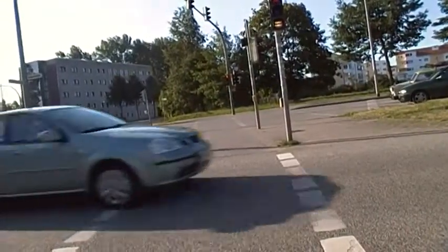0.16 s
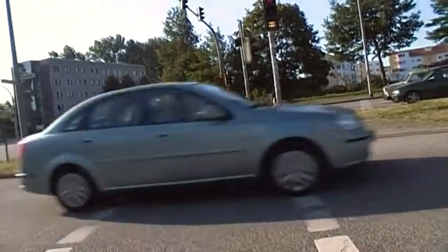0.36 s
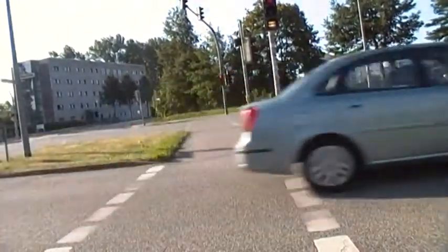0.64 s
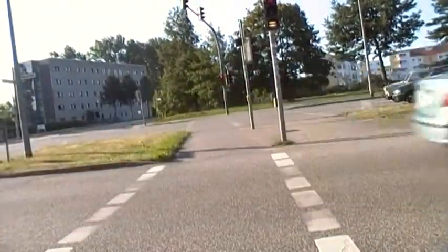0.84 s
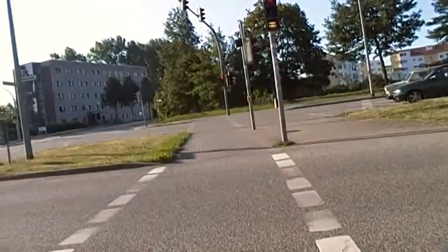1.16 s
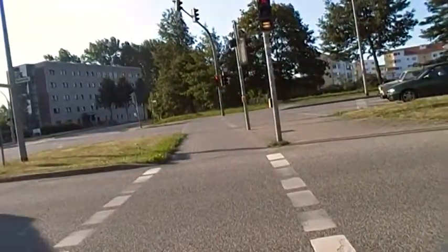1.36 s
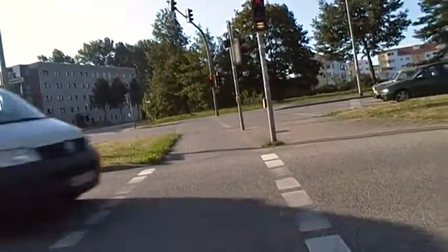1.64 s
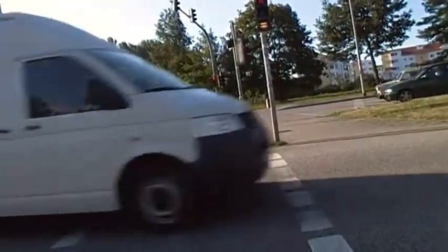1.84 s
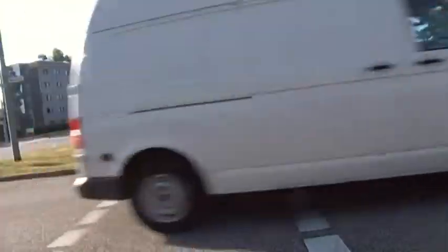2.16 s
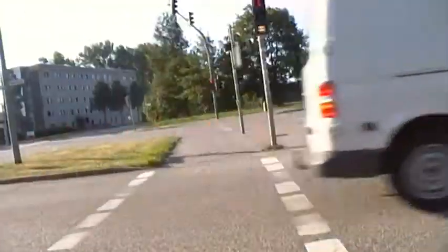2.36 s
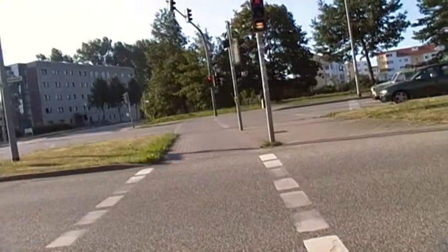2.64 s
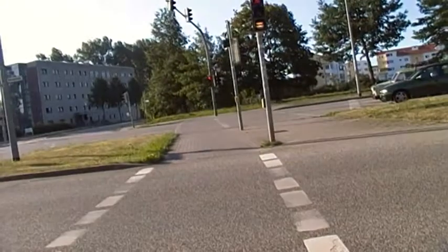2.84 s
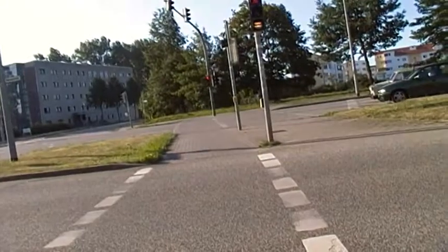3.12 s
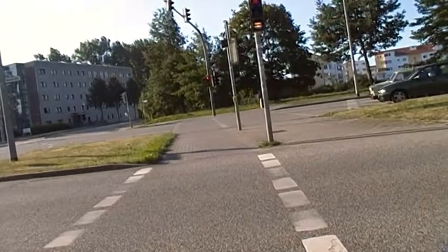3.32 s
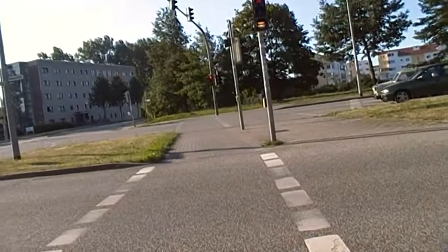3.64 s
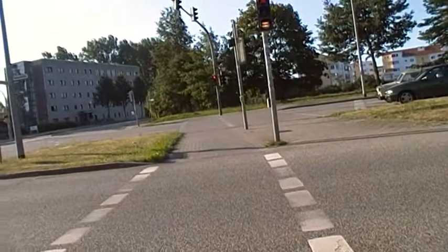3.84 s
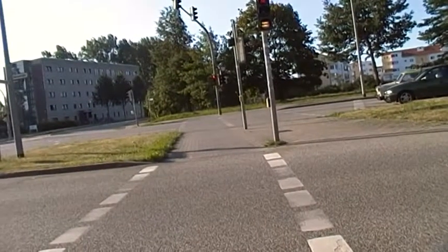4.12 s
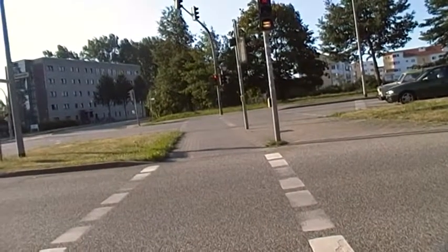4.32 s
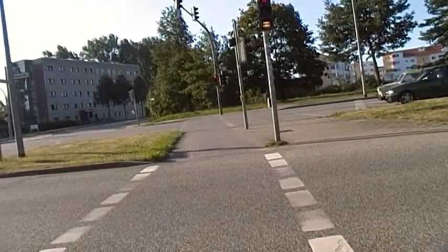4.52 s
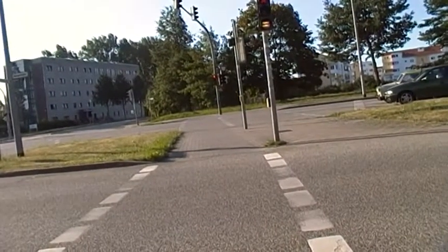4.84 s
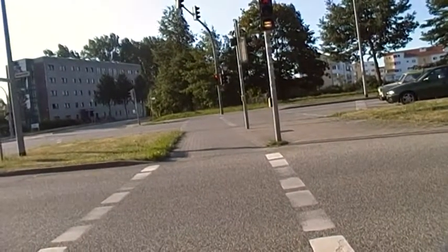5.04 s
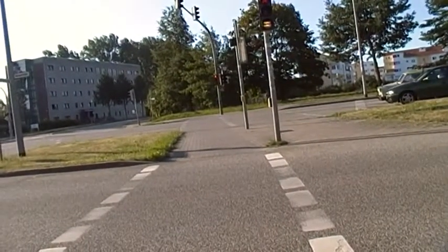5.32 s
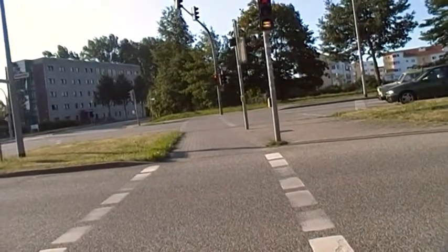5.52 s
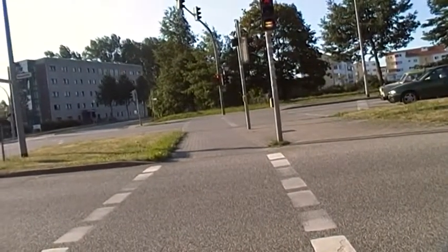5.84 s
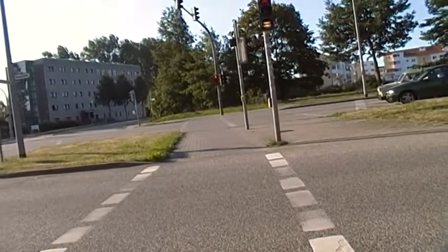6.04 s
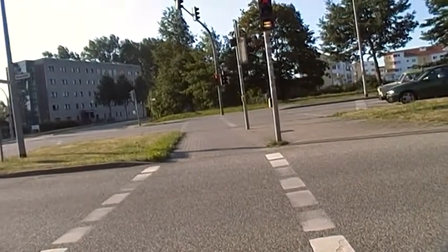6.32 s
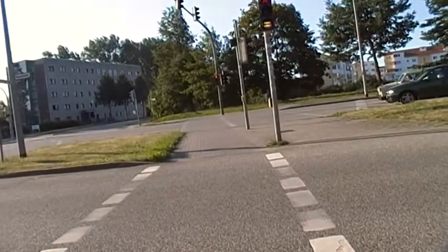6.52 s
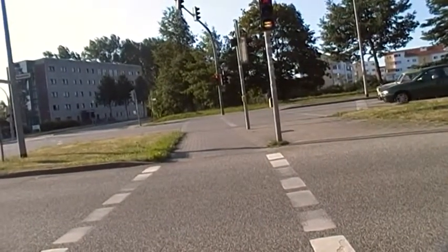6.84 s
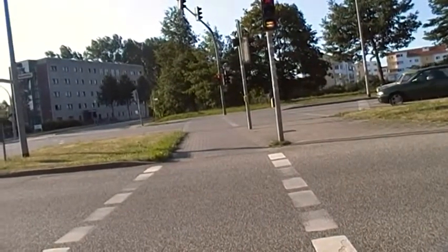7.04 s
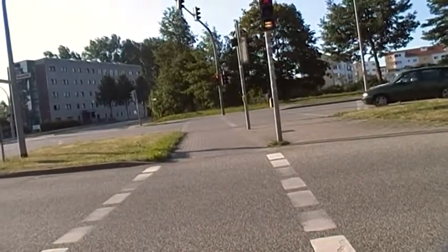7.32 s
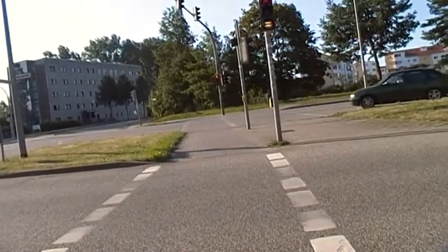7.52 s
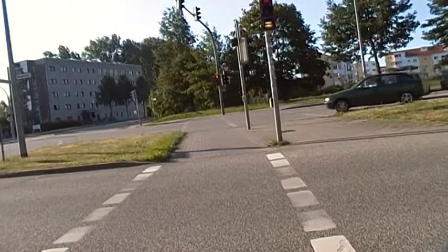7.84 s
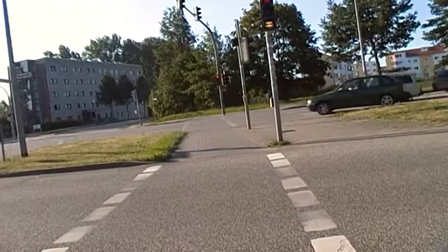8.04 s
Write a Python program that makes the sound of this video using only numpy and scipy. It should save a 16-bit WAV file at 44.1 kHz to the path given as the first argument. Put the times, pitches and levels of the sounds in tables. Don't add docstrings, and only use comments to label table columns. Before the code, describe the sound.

Strong wind buffets the microphone over passing cars and a van with rushing tyres, then a nearby engine revs and settles as traffic hums.

```python
import sys
import numpy as np
from scipy import signal
from scipy.fft import rfft, irfft
from scipy.io import wavfile
from scipy.ndimage import map_coordinates

SR = 44100
rng = np.random.default_rng(int(sys.argv[2]) if len(sys.argv) > 2 else 0)


def int16_out(signal):
    q = np.round(np.clip(np.atleast_2d(signal).T, -1, 1) * 32767)
    wavfile.write(sys.argv[1], SR, q.astype(np.int16))


def volts_from_decibels(level):
    exponent = np.asarray(level, float) / 20
    return 10 ** exponent


N = 360738
TIME = np.arange(N) / SR
COARSE = TIME[::32]

# f/Hz, level/dB [per Hz]
TOWN_HISS = [(1500, -20), (2500, -12), (5000, -10.5), (8000, -15), (9500, -21.5), (10600, -31)]
# f/Hz, level/dB [per Hz]
BODY_DRONE = [(25, -7.5), (60, 6), (120, -1), (250, -2.5), (450, -3.5), (650, -2), (850, -7.5), (1200, -35)]
# f/Hz, level/dB [per Hz]
TYRE_ROAR = [(500, -37.5), (720, -2.5), (900, 1.5), (1100, 1), (1400, 0), (1700, -3), (2000, -9),
             (2600, -16.5)]
# f/Hz, level/dB [per Hz]
TREAD_HISS = [(1300, -31.5), (1900, -2.5), (2600, -3), (3400, -0.5), (4300, -3.5), (5600, -8.5),
              (6400, -8.5), (7800, -14.5), (8800, -21), (9800, -35)]
# f/Hz, likeness [0..1]
LIKENESS = [(60, 0.86), (300, 1), (600, 0.95), (1200, 0.93), (2500, 0.93), (5000, 0.84), (10000, 0.19)]
# drone level/dB, roar level/dB, hiss level/dB
STREAM_DB = [-28.5, -29, -34]
# nearest t/s, distance over speed/s, drone level/dB, roar level/dB, hiss level/dB
PASSES = [(.72, 0.31, -18, -19, -41), (1.35, 0.32, -21.5, -17.5, -24.5), (2.15, 0.23, -22.5, -27.5, -21.5),
          (3.0, 0.15, -23.5, -26.5, -25.5), (3.5, 0.29, -24.5, -22.5, -31), (4.2, 0.32, -36.5, -20, -29),
          (5.2, 0.66, -29.5, -20, -33.5), (6.8, 0.41, -27, -23, -32), (7.5, 0.59, -48, -22.5, -44),
          (2.7, 0.13, -41, -24, -30), (1.7, 0.084, -21.5, -29, -25.5)]
# t/s, length/s, f/Hz, width/Hz, level/dB
VAN_BANDS = [
    (1.6, .35, 940, 90, -27),
    (2.12, .5, 880, 120, -26),
    (2.15, .4, 540, 110, -32),
    (2.2, .7, 3400, 420, -31),
    (1.9, .5, 4300, 400, -35),
    (2.8, .4, 650, 200, -30),
    (1.15, .25, 3500, 500, -36),
    (2.75, .3, 300, 120, -30),
    (3.33, .12, 520, 200, -27),
    (2.67, .16, 4150, 500, -36),
]
# t/s, left over right level/dB, left later by/ms
BEARING = [
    (0, 0.5, -0.079),
    (1.0, -4, -0.034),
    (1.5, 0, -0.046),
    (2.4, 1, 0.019),
    (3.2, 3, 0.046),
    (4.0, -1.5, 0.051),
    (4.6, -1, 0.042),
    (8.18, -0.8, 0.038),
]
# t/s, length/s, f/Hz, width/Hz, level/dB
SQUEALS = [
    (6.47, .1, 9750, 400, -54),
    (6.79, .18, 9900, 450, -49),
    (7.05, .17, 9880, 450, -50),
]
# t/s, firing f/Hz, firing tone level/dB
ENGINE = [
    (5.4, 57, -32),
    (6.3, 54.5, -33),
    (6.45, 52.5, -26),
    (6.56, 63, -19),
    (6.68, 75, -16),
    (6.82, 76.5, -16),
    (7.28, 66.2, -17),
    (7.7, 57.5, -20.5),
    (8.18, 57.2, -22),
]
# multiple of the firing rate, level/dB [over the firing tone]
UPPER_ORDERS = [(.5, -22), (1.5, -21), (2.5, -24), (4, -25), (5, -30)]
# f/Hz, level/dB
EXHAUST = [(105, -4), (115, -4), (122, -12), (153, -12), (165, -7), (182, -10), (198, -13), (212, -23)]
# t/s, f/Hz, level/dB
PULLING_AWAY = [
    (7.7, 112, -44),
    (7.88, 116, -30),
    (8.02, 130, -27),
    (8.18, 146, -27),
]
# t/s, left level/dB, right level/dB
WIND = [(0, -19, -20), (.5, -16, -27), (.75, -20.5, -15), (1.0, -14.5, -27.5), (1.45, -18.5, -21),
        (2.2, -26, -31), (2.93, -15, -34), (3.17, -22.5, -23), (3.45, -19.5, -28), (3.85, -14.5, -24),
        (4.3, -17, -15.5), (4.55, -17, -23.5), (4.78, -17, -14), (4.94, -16.5, -20.5), (5.32, -14, -25),
        (5.55, -23, -25), (6.9, -39, -58), (7.85, -32.5, -25)]
# f/Hz, level/dB [per Hz]
BUFFET = [(12, -38), (20, -14), (55, 5), (211, -2), (256, -14), (305, -4), (406, -25.5), (698, -27),
          (900, -61), (1170, -46), (1980, -120)]
# f/Hz, level/dB [per Hz]
EDGE_FLUTTER = [(140, 4), (230, 2), (380, 0.5), (520, -9)]
# f/Hz, level/dB [per Hz]
RASP = [(7000, -12), (9000, -6), (11000, 1), (12000, -1)]
# t/s, peak level/dB [as heard], drop of the gain control/dB
BLOWS_LEFT = [(.012, -9, 2.5), (.094, -3.5, -1), (.151, 0, 7), (.222, -8, 7), (.252, 1, 3.5),
              (.364, -3, 9.5), (.452, -9, 5.5), (.573, -2, 3.5), (.611, 6.5, 14.5), (.65, -1, 6),
              (.712, 1.5, 10.5), (.804, 1, 6), (.857, -4, 10), (.903, -5, 7), (.973, -1, 9.5), (1.1, -2, 4),
              (1.243, -7, 2.5), (1.311, -10, 10.5), (1.688, -3, 4), (2.312, -3, 0), (3.728, -6, 4),
              (4.04, -8, 2.5), (4.161, -7, 3.5), (4.63, -5, 1.5), (4.728, -6, 3.5), (5.041, -4, 11.5),
              (5.138, 3, 10), (5.184, -12, 11), (5.26, -10.5, 9), (5.352, -5, 10)]
BLOWS_RIGHT = [(.01, -14, 4), (.098, 9, -2), (.126, 8, -6), (.202, 7, 9.5), (.227, -3, 5), (.385, 10, 17),
               (.46, -9, 16), (.553, -2, 16), (.617, -5, 10), (.752, -1, 14), (.85, -12, 10),
               (.98, 0, 10.5), (1.106, -4, 4), (1.234, -1.5, 12.5), (1.34, 1, 8), (1.759, -5, -7),
               (1.958, -6, 2.5), (2.124, -5, 3), (2.31, -.5, 6.5), (3.224, -5, -4), (3.779, -5, 5.5),
               (4.21, -6, -2), (4.273, 1, 5.5), (4.357, -3, 5), (4.443, -1.5, 9), (4.474, -6, 18),
               (4.73, -6, 7.5), (4.846, -1.5, 9.5), (5.226, -6, -1)]
# left f/Hz, right f/Hz
BLOW_HZ = [172, 213]
# left/s, right/s
RECOVERY_S = [0.062, 0.083]
SLOW_SHARE = [0.16, 0.58]


def rms_one(x):
    return x / np.sqrt(np.mean(x ** 2) + 1e-20)


def in_time(rows):
    s, *columns = np.transpose(rows)
    return [np.interp(TIME, s, c) for c in columns]


def at_hz(points, hz):
    point_hz, level = np.transpose(points)
    return np.interp(np.log(hz), np.log(point_hz), level)


def drift(rate):
    r = np.exp(-80 * np.pi * rate / SR)
    white = rng.standard_normal(N // 40 + 2002)
    slow = signal.lfilter([1], [1, -2 * r, r * r], white)[2000:]
    return np.interp(np.arange(N) / 40, np.arange(len(slow)), rms_one(slow))


def drift_pair(rate):
    return np.array([drift(rate), drift(rate)])


def coloured(spectrum, channels):
    hz = np.maximum(np.fft.rfftfreq(N, 1 / SR), 1)
    closed = [(spectrum[0][0] / 2, -70)] + list(spectrum) + [(spectrum[-1][0] * 2, -70)]
    white = rfft(rng.standard_normal((channels, N)))
    return rms_one(irfft(white * volts_from_decibels(at_hz(closed, hz)), N))


def swells(rows):
    out = np.zeros(N)
    for s, length, hz, width, level_db in rows:
        r = np.exp(-np.pi * width / SR)
        pole = [1, -2 * r * np.cos(2 * np.pi * hz / SR), r * r]
        once = signal.lfilter([1], pole, rng.standard_normal(N))
        band = signal.lfilter([1], pole, once)
        bell = np.exp(-(2 * (TIME - s) / length) ** 2)
        out += volts_from_decibels(level_db) * bell * rms_one(band)
    return out


def road_noise(spectrum, patchy_db, flutter_db):
    mid, side = rfft(coloured(spectrum, channels=2))
    hz = np.maximum(np.fft.rfftfreq(N, 1 / SR), 1)
    alike = np.clip(at_hz(LIKENESS, hz), 0, 1)
    pair = np.sqrt(1 + alike) * mid + np.sqrt(1 - alike) * side * [[1], [-1]]
    low_hz, high_hz = spectrum[1][0], spectrum[-2][0]
    place = np.clip(2 * np.log(hz / low_hz) / np.log(high_hz / low_hz), 0, 2)
    together, out = drift(9.9), 0
    for zone in range(3):
        share = np.clip(1 - abs(place - zone), 0, 1)
        waver_db = patchy_db * drift(1.16) + flutter_db * together
        out = out + irfft(pair * share, N) * volts_from_decibels(waver_db)
    return rms_one(out)


def passing():
    power = volts_from_decibels(np.array(STREAM_DB)[:, None]) ** 2
    for s, reach, *level_db in PASSES:
        nearness = 1 / (1 + ((COARSE - s) / reach) ** 2)
        power = power + volts_from_decibels(np.array(level_db)[:, None]) ** 2 * nearness
    return [np.interp(TIME, COARSE, layer) for layer in 10 * np.log10(power)]


def traffic():
    drone_db, roar_db, hiss_db = passing()
    pan_db, late_ms = in_time(BEARING)
    sound = volts_from_decibels(drone_db + 0.5) * road_noise(BODY_DRONE, patchy_db=0.8, flutter_db=1.3)
    sound += volts_from_decibels(roar_db) * road_noise(TYRE_ROAR, patchy_db=0.5, flutter_db=0.6)
    sound += volts_from_decibels(hiss_db) * road_noise(TREAD_HISS, patchy_db=0.4, flutter_db=0.5)
    sound += volts_from_decibels(-39) * road_noise(TOWN_HISS, patchy_db=0.4, flutter_db=0.3)
    sound += swells(VAN_BANDS)
    late = np.arange(N) - late_ms * SR / 1000
    left = map_coordinates(sound[0], [late], order=3, mode="nearest")
    return np.array([left * volts_from_decibels(pan_db / 2), sound[1] * volts_from_decibels(-pan_db / 2)])


def brake():
    return swells(SQUEALS) * volts_from_decibels([[2.], [-3.]])


def tone(hz, wobble_db, rate):
    turns = np.cumsum(hz) / SR + rng.random()
    return np.sqrt(2) * np.sin(2 * np.pi * turns) * volts_from_decibels(wobble_db * drift(rate))


def engines():
    hz, firing_db = in_time(ENGINE)
    pulling = (TIME > 6.62) * (TIME < 7.27)
    second_db = firing_db + at_hz(EXHAUST, 2 * hz)
    third_db = firing_db + at_hz(EXHAUST, 3 * hz) - 9 * pulling
    sound = volts_from_decibels(firing_db) * tone(hz, wobble_db=1.3, rate=16)
    sound += volts_from_decibels(second_db) * tone(2 * hz, wobble_db=1.8, rate=14)
    sound += volts_from_decibels(third_db) * tone(3 * hz, wobble_db=1.8, rate=14)
    for multiple, level_db in UPPER_ORDERS:
        sound += volts_from_decibels(firing_db + level_db) * tone(multiple * hz, wobble_db=5.5, rate=34)
    sound *= np.clip((TIME - ENGINE[0][0]) / 0.12, 0, 1)
    other_hz, other_db = in_time(PULLING_AWAY)
    other = volts_from_decibels(other_db) * tone(other_hz, wobble_db=0.5, rate=13)
    return sound + other * (TIME > PULLING_AWAY[0][0])


def ducking(rows, attack, recovery, share):
    drop_db = np.zeros(len(COARSE))
    for s, _, depth_db in rows:
        age = np.maximum(COARSE - s, 0)
        quick = (1 - share) * np.exp(-(age / recovery) ** 2)
        slow = share * np.exp(-age / 0.35)
        drop_db = np.maximum(drop_db, np.minimum(age / attack, 1) * depth_db * (quick + slow))
    return volts_from_decibels(-np.interp(TIME, COARSE, drop_db))


def thumps(rows, cycles):
    out = np.zeros(N)
    for (s, peak_db, hz), turn in zip(rows, rng.random(len(rows))):
        at = np.arange(max(int((s - 0.03) * SR), 0), int((s + 0.03) * SR))
        phase = (at / SR - s) * hz
        crest = np.exp(-abs(phase / cycles))
        out[at] += volts_from_decibels(peak_db) * crest * np.cos(2 * np.pi * (phase + turn))
    return out


def blows(rows, side, wind_db, cycles):
    when, force, pace = rng.random((70, 3)).T
    s = 0.04 + when * (TIME[-1] - 0.1)
    small_db = np.interp(s, TIME, wind_db) + 5.5 + 9.7 * (force - 0.5)
    small = list(zip(s, small_db, 95 + 70 * pace))
    strong = [(s, db, BLOW_HZ[side] + 6 * db) for s, db, _ in rows]
    return thumps(strong + small, cycles)


def swelling(rows):
    near = sum(np.exp(-((COARSE - s) / 0.065) ** 2) for s, *_ in rows)
    return 4.5 * np.interp(TIME, COARSE, np.minimum(near, 1))


def wind():
    lumps = volts_from_decibels(1.8 * drift_pair(14) + 2.5 * drift_pair(70))
    left_db, right_db = in_time(WIND)
    gust_db = np.array([left_db + swelling(BLOWS_LEFT), right_db + swelling(BLOWS_RIGHT)])
    bed = volts_from_decibels(gust_db - 3.5) * rms_one(coloured(BUFFET, channels=2) * lumps)
    edge = rms_one(coloured(EDGE_FLUTTER, channels=2) * volts_from_decibels(5.5 * drift_pair(25)))
    bed += volts_from_decibels(gust_db - 13.5) * edge
    bed += volts_from_decibels(gust_db - 46.5) * coloured(RASP, channels=2)
    left_blows = blows(BLOWS_LEFT, 0, left_db, cycles=0.3)
    right_blows = blows(BLOWS_RIGHT, 1, right_db, cycles=0.21)
    return bed + volts_from_decibels(3.0) * np.array([left_blows, right_blows])


def scene():
    street = traffic() + engines() * volts_from_decibels([[0.3], [-0.3]]) + brake()
    gain = np.array([ducking(BLOWS_LEFT, 0.0016, RECOVERY_S[0], SLOW_SHARE[0]),
                     ducking(BLOWS_RIGHT, 0.0032, RECOVERY_S[1], SLOW_SHARE[1])])
    return street * gain + wind()


def roll_off(x):
    return signal.sosfilt(signal.butter(12, 11190, fs=SR, output="sos"), x)


def record(dry):
    ceiling = 0.88
    mix = dry / (1 + abs(dry / ceiling) ** 6) ** (1 / 6)
    return roll_off(mix)


dry = scene()
out = record(dry)
int16_out(out)
```